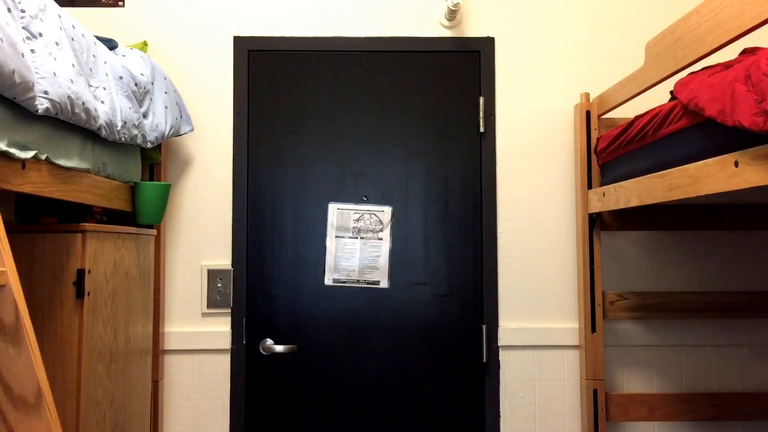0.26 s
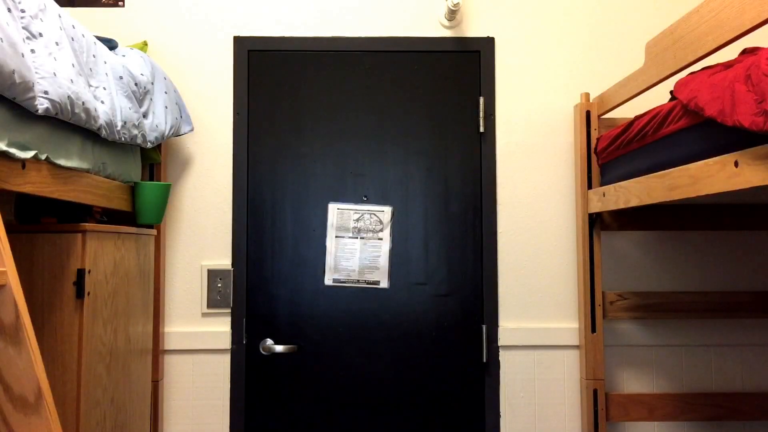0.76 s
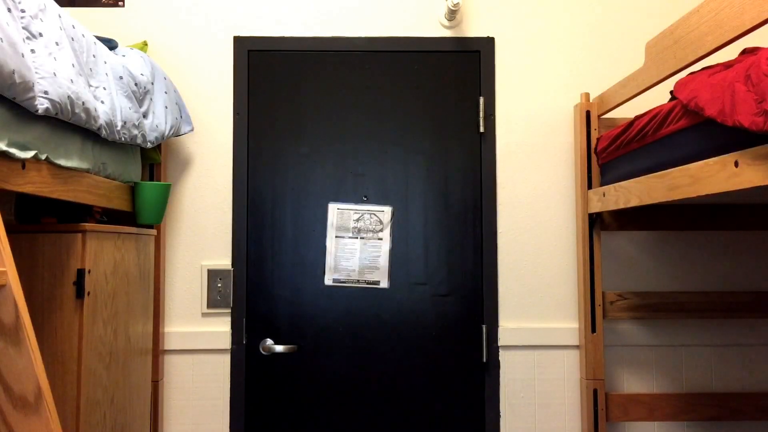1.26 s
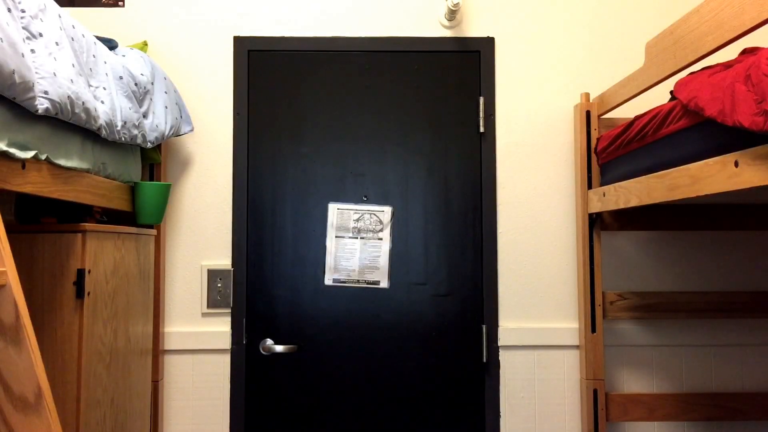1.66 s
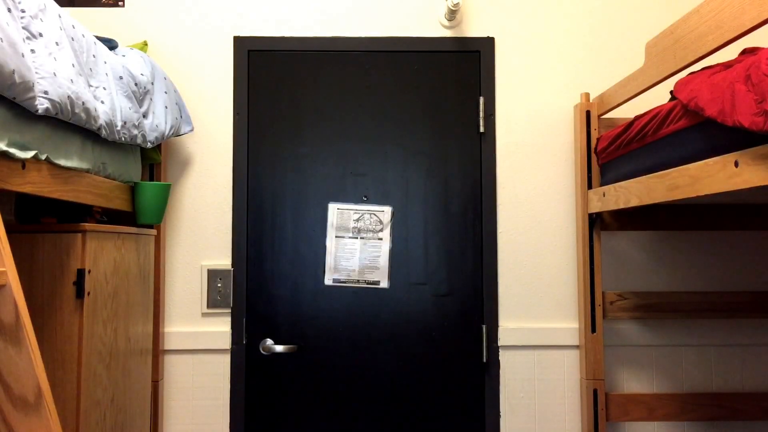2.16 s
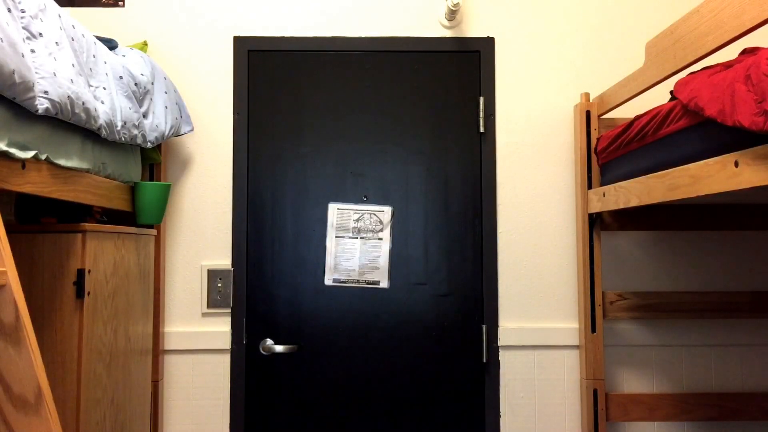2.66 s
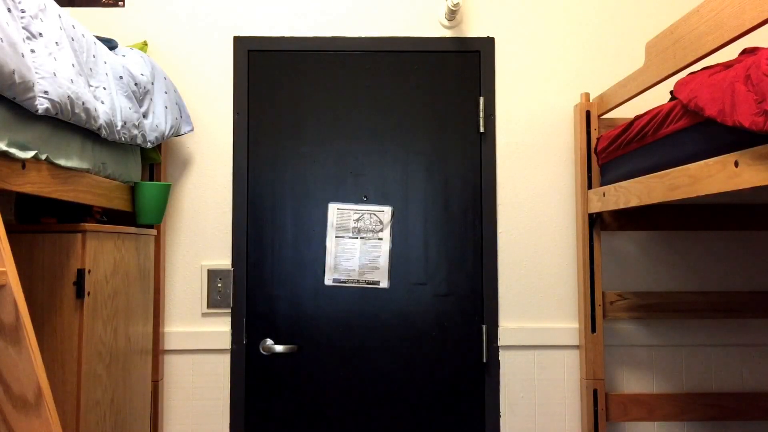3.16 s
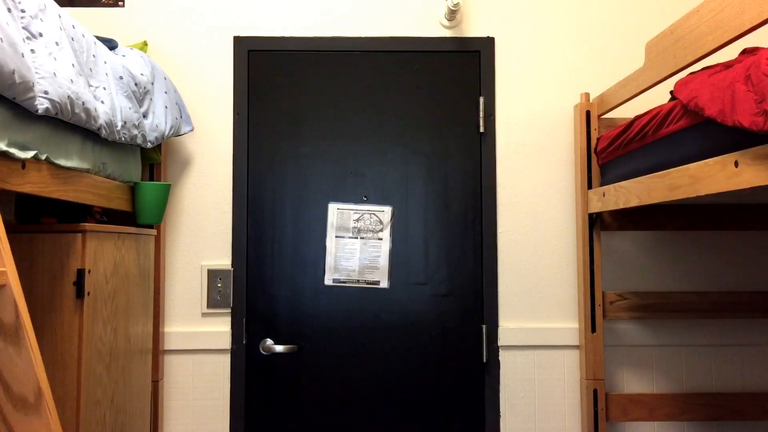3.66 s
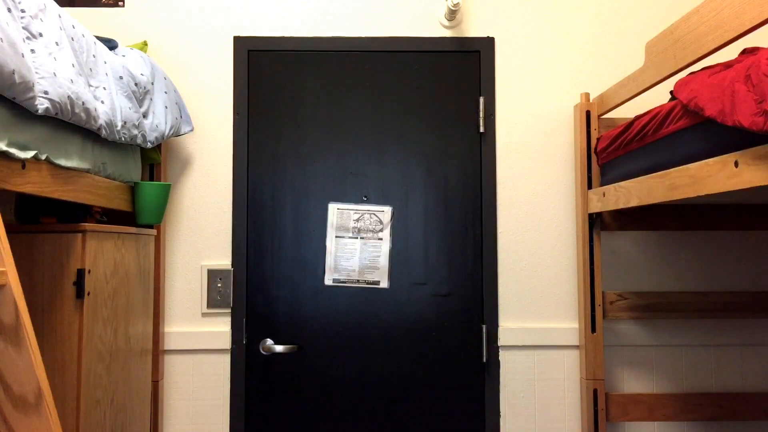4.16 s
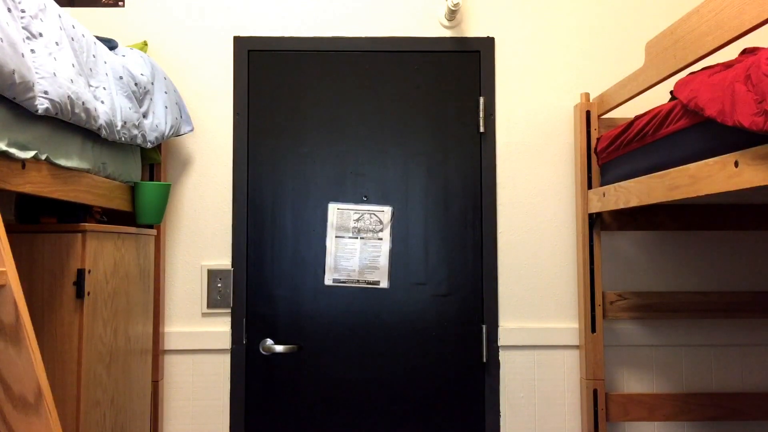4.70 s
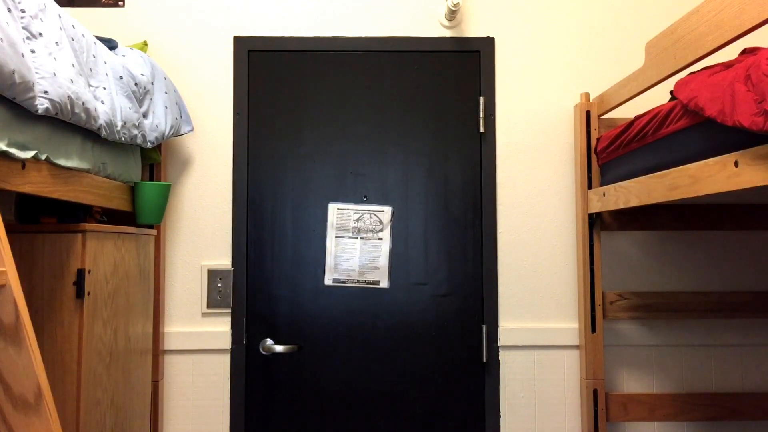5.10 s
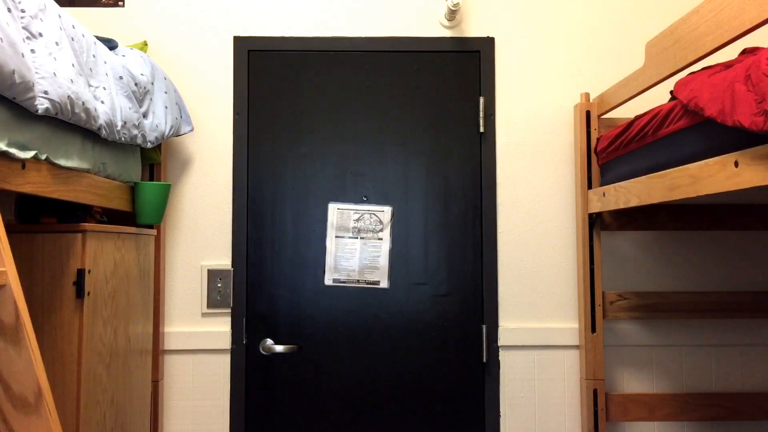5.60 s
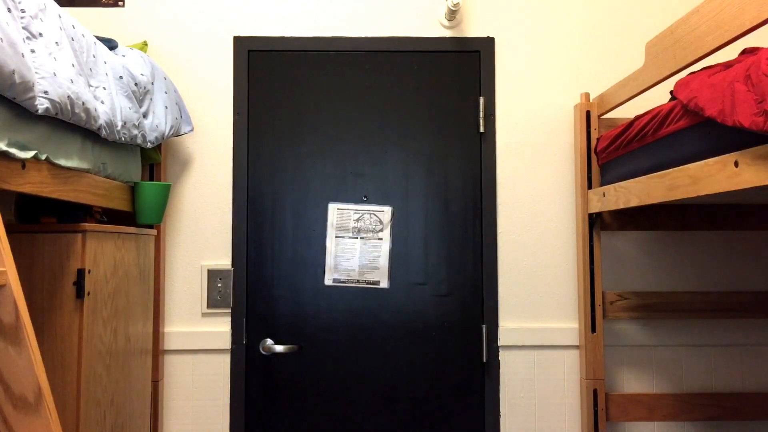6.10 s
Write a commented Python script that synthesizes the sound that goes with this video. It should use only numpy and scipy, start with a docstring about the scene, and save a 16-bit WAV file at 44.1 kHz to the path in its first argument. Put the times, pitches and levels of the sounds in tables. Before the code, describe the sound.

Heard from inside a bedroom, a few metres from the door, low ventilation noise and a wavering hum come first, with faint far-off squeaks and a motor that swells and fades. Then the door is unlocked from outside: a soft knock, metallic clicks and short scrapes of the key, the bolt snapping as the door thuds, and finally a crisp click of the handle and latch.

```python
"""A door unlocked, heard from the bedroom.

Beyond a heavy closed door a few metres away, a key slides in and turns, the bolt snaps, the handle
moves and the latch lets go. Each contact excites damped modes of the door panel, the lock case and a
small steel part; friction adds scrapes, and shoves make the door thud. Under it lie ventilation noise,
a faint mains tone, a low hum that comes and goes, the throb of a far motor and distant squeaks."""
import sys
import numpy as np
from scipy import signal
from scipy.fft import rfft, irfft
from scipy.io import wavfile
from scipy.ndimage import uniform_filter1d

SR = 44100
rng = np.random.default_rng(int(sys.argv[2]) if len(sys.argv) > 2 else 0)


def materialize(psi):
    """Save the field psi as 16-bit PCM at rate SR to the path in sys.argv[1].

    A 1-D psi becomes a single channel; in a 2-D psi each row is a channel.
    """
    bounded = np.clip(np.atleast_2d(psi).T, -1, 1)
    quanta = np.round(bounded * 32767).astype(np.int16)
    wavfile.write(sys.argv[1], SR, quanta)


N = 279594
RING = SR // 2   # samples allowed for one contact to die away


def from_db(db):
    """Decibels to amplitude ratio."""
    return 10 ** (np.asarray(db) / 20)


def rms_one(x):
    """Normalisation to an rms of 1."""
    return x / np.sqrt(np.mean(x ** 2) + 1e-20)


def at_level(x, db):
    """Normalisation of a transient by the rms of its first 50 ms."""
    return x * from_db(db) / np.sqrt(np.mean(x[:SR // 20] ** 2) + 1e-20)


def in_time(rows):
    """Linear interpolation of (seconds, value) points at every sample."""
    times, values = np.transpose(rows)
    return np.interp(np.arange(N) / SR, times, values)


def add(out, s, sound):
    """Superposition: a sound joins the mix at s seconds."""
    at = int(np.clip(round(s * SR), 0, N - 1))
    out[at:at + len(sound)] += sound[:N - at]


def band(x, low_hz, high_hz, order=2):
    """Causal Butterworth band-pass."""
    edges = [low_hz, min(high_hz, SR / 2 - 100)]
    return signal.sosfilt(signal.butter(order, edges, "band", fs=SR, output="sos"), x)


def drift(rate_hz):
    """Slow random fluctuation: low-passed noise of rms 1."""
    slow = signal.sosfilt(signal.butter(2, rate_hz, fs=SR, output="sos"), rng.standard_normal(N + SR))
    return rms_one(slow[SR:])


def shaped_noise(spectrum):
    """Spectral shaping: noise of rms 1 follows (Hz, dB) points and rolls off beyond them."""
    hz, db = np.transpose(spectrum)
    bins = np.maximum(np.fft.rfftfreq(N, 1 / SR), 1)
    gain = from_db(np.interp(np.log(bins), np.log(hz), db))
    roll_off = np.hypot(1, (bins / hz[-1]) ** 20) * np.hypot(1, (hz[0] / bins) ** 2)
    return rms_one(irfft(rfft(rng.standard_normal(N)) * gain / roll_off, N))


def resonate(force, modes, scatter_db=7.5):
    """Modal superposition: a force drives damped resonators, each with random sign and strength."""
    out = 0
    for hz, width_hz, db in modes:
        radius = np.exp(-np.pi * width_hz / SR)
        poles = [1, -2 * radius * np.cos(2 * np.pi * hz / SR), radius ** 2]
        gain = rng.choice([-1, 1]) * from_db(db + scatter_db * rng.standard_normal())
        out = out + gain * (1 - radius ** 2) / 2 * signal.lfilter([1, 0, -1], poles, force)
    return out


# Spectra of the ventilation. Each row: frequency in Hz, relative spectral density in dB.
RUMBLE_SPECTRUM = [(18, -38), (33, -34), (44, -6), (60, -15), (78, -9), (100, -9), (135, 1), (158, 3),
                   (175, -12), (190, -2.5), (228, -6), (275, -5), (345, -11), (410, -24)]
HISS_SPECTRUM = [(240, -9), (400, -3), (445, -1.5), (488, -9.5), (527, -2), (634, -3), (874, -4), (973, -4),
                 (1170, -5), (1410, -9), (1660, -9), (2230, -13.5), (4940, -19), (8980, -22.5),
                 (15600, -28)]
# Course of the rumble. Each row: time in seconds, level in dB.
RUMBLE_LEVEL = [(0, -52.5), (1.7, -50.5), (3.1, -54), (3.4, -56.5), (3.75, -49.5), (3.92, -57.5),
                (4.05, -51.5), (5.4, -52.5), (5.7, -57), (5.95, -51.5), (6.34, -58)]


def ventilation(hiss_db=-64.5):
    """Broadband noise: a slowly modulated rumble and a steady hiss."""
    rumble = from_db(in_time(RUMBLE_LEVEL)) * shaped_noise(RUMBLE_SPECTRUM)
    return rumble + from_db(hiss_db) * shaped_noise(HISS_SPECTRUM)


def mains_tone(hz=360, db=-70):
    """A pure tone at one harmonic of the mains."""
    return from_db(db) * np.sqrt(2) * np.sin(2 * np.pi * hz * np.arange(N) / SR)


# Far-off squeaks. Each row: midpoint in seconds, frequency in Hz, level at the midpoint in dB.
SQUEAKS = [(0.25, 1170, -70), (0.925, 812, -66), (1.07, 882, -65), (1.25, 810, -66.5), (1.36, 857, -63),
           (1.635, 860, -63.5), (1.885, 805, -65.5)]


def squeaks(length_s=0.18, roughness=0.99):
    """Narrow-band noise around a short tone blurs its pitch and roughens it."""
    out, t = np.zeros(N), np.arange(int(length_s * SR)) / SR
    for s, hz, db in SQUEAKS:
        blur = rms_one(band(rng.standard_normal(len(t)), hz * 0.815, hz * 1.08))
        tone = rms_one(np.sin(2 * np.pi * hz * t) + roughness * blur)
        add(out, s - length_s / 2, from_db(db) * np.hanning(len(t)) * tone)
    return out


def wavering_tone(phase, depth_db, rate_hz):
    """Random modulation: noise in phase varies the amplitude, noise in quadrature the phase."""
    depth = from_db(depth_db)
    return (1 + depth * drift(rate_hz)) * np.sin(phase) + depth * drift(rate_hz) * np.cos(phase)


# Swells of the hum. Each row: start and end of the hold in seconds, level in dB, sag in Hz per second.
HUM_SWELLS = [(0, 0.08, -46, 1), (0.69, 1.428, -52, 1.9), (4.037, 4.114, -53, 1.4),
              (4.586, 5.472, -49, 12.6)]


def low_hum(pitch_hz=155.1, rest_db=-70, attack_s=0.16, release_s=0.075, beat_hz=9.4):
    """Beating: a low note swells and sags in pitch, interfering with a weaker tone just above it."""
    t = np.arange(N) / SR
    hz, gain = pitch_hz, from_db(rest_db)
    for start_s, end_s, db, sag_hz_per_s in HUM_SWELLS:
        swell = np.exp(-np.maximum(start_s - t, 0) / attack_s - np.maximum(t - end_s, 0) / release_s)
        gain = np.maximum(gain, from_db(db) * swell)
        hz = np.where(t < start_s, hz, pitch_hz - sag_hz_per_s * (np.minimum(t, end_s) - start_s))
    phase = 2 * np.pi * np.cumsum(hz) / SR
    note = wavering_tone(phase, depth_db=-34, rate_hz=20.5)
    neighbour = from_db(-8.5) * np.sin(phase + 2 * np.pi * beat_hz * t + drift(0.61))
    return gain * np.sqrt(2) * (note + neighbour)


# Speed of the far motor. Each row: time in seconds, speed in turns per second.
MOTOR_SPEED = [(0, 13.6), (1, 13.95), (1.5, 14.26), (2, 14.52), (2.35, 14.57), (3, 14.26), (3.5, 14.05),
               (3.8, 13.72), (6.34, 13.8)]
# Its strength. Each row: time in seconds, level in dB of a harmonic exactly at resonance.
MOTOR_LEVEL = [(0, -68), (1, -55), (1.5, -47.5), (2.1, -44), (2.6, -44), (3.1, -46.5), (3.8, -51.5),
               (4.1, -65), (5.5, -62.5), (5.8, -55), (6.34, -65.5)]


def motor(resonance_hz=263.5, half_width_hz=8.65):
    """Forced vibration: harmonics of the rotation glide through a resonance of the building and beat."""
    speed = in_time(MOTOR_SPEED)
    shaft_angle = 2 * np.pi * np.cumsum(speed) / SR
    out = np.zeros(N)
    for harmonic in range(16, 21):
        response = 1 / (1 + ((harmonic * speed - resonance_hz) / half_width_hz) ** 2)
        phase = harmonic * shaft_angle + rng.uniform(0, 2 * np.pi) + 0.5 * drift(1.87)
        out += response * wavering_tone(phase, depth_db=-17, rate_hz=9)
    return from_db(in_time(MOTOR_LEVEL)) * np.sqrt(2) * out


# Modes of the door leaf. Each row: frequency in Hz, bandwidth in Hz, gain in dB.
LEAF_MODES = [(47, 9, -6), (81, 7.8, 1), (106, 11, -3), (125.5, 12, -5)]
# Shoves from key and handle. Each row: start in seconds, level in dB.
SHOVES = [(3.649, -51), (4.891, -50), (5.318, -41.5), (5.949, -57), (6.192, -52)]


def door_thuds(push_s=0.0057):
    """Impulse response: a soft push excites the low modes of the whole door in its frame."""
    out = np.zeros(N)
    push = np.sin(np.pi * np.minimum(np.arange(RING) / (push_s * SR), 1)) ** 2
    for s, db in SHOVES:
        thud = band(resonate(push, LEAF_MODES, scatter_db=8.5), 30, 160)
        add(out, s, at_level(thud, db))
    return out


def whiten(burst, smoothing_bins=110):
    """Whitening: division by its smoothed spectrum levels a burst's colour but keeps its course."""
    spectrum = rfft(burst, 2 * RING)
    power = uniform_filter1d(np.abs(spectrum) ** 2, smoothing_bins)
    return irfft(spectrum / np.sqrt(np.abs(power) + 1e-20))[:RING]


def blow(slide_s, direct_db, walls_db, t60, direct_s=0.0018, walls_s=0.021, spread_s=0.0073, grip=0.25):
    """A gritty contact in a room: direct sound, early reflections and diffuse tail add in power."""
    t = np.arange(RING) / SR
    direct = from_db(direct_db) * np.exp(-t / direct_s)
    walls = from_db(walls_db) * np.exp(-0.5 * ((t - walls_s) / spread_s) ** 2)
    tail = np.exp(-np.log(1000) * t / t60)
    # sliding smears the energy over time, and the parts take a moment to grip
    power = signal.lfilter([1], [1, -np.exp(-2 / (slide_s * SR))], direct ** 2 + walls ** 2 + tail ** 2)
    rise = 1 - np.exp(-t / (grip * slide_s))
    return whiten(rise * np.sqrt(power) * rng.standard_normal(RING))


def favour(modes, centre_hz, lift_db, db_per_square_octave=10):
    """Selective excitation: the contact point favours modes near one pitch and may lift those on it."""
    weighted = []
    for hz, width_hz, db in modes:
        fall = db_per_square_octave * np.log2(hz / centre_hz) ** 2
        lift = lift_db * np.exp(-((hz / centre_hz - 1) / 0.04) ** 2)
        weighted.append((hz, width_hz, db - fall + lift))
    return weighted


# Modes of the door panel. Each row: frequency in Hz, bandwidth in Hz, gain in dB.
PANEL_MODES = [(317, 27, 4), (374.6, 9.9, 9), (390.7, 14.4, 10.5), (408, 37, -14), (509, 35, -6),
               (559, 15, -2), (648, 33, 1), (723, 23, -1.5), (808, 44, -11)]


def panel_ring(slide_s, centre_hz, lift_db):
    """Plate vibration: the door panel answers a blow with a hollow knock."""
    push = blow(slide_s, direct_db=-11, walls_db=-14, t60=0.2)
    ring = resonate(push, favour(PANEL_MODES, centre_hz, lift_db), scatter_db=0)
    return band(ring + from_db(-9) * push, 200, 750)


# Modes of the lock case. Each row: frequency in Hz, bandwidth in Hz, gain in dB.
CASE_MODES = [(892, 22, -3), (932, 22, -3), (1042, 26, 6.5), (1145, 26, -1.5), (1204, 26, -1.5),
              (1293, 26, -0.5), (1448, 36, -2), (1500, 24, -1.5), (1683, 24, 8), (1793, 28, -2),
              (1950, 70, -13), (2105, 50, -13), (2320, 40, -6), (2408, 26, 2), (2630, 70, -3),
              (2800, 70, -1)]


def case_ring(slide_s, centre_hz, lift_db):
    """Resonant build-up: a bare clack comes first, then the modes of the lock case grow."""
    knock = blow(slide_s, direct_db=2, walls_db=8, t60=0.22, walls_s=0.012, spread_s=0.0045)
    clack = blow(slide_s, direct_db=12, walls_db=-2, t60=0.31)
    clack = from_db(-4.5) * band(clack, centre_hz * 0.58, centre_hz * 1.15)
    ring = resonate(knock, favour(CASE_MODES, centre_hz, lift_db), scatter_db=-1.1)
    return band(ring + clack, 810, 2300, order=4)


# Modes of the small steel parts. Each row: frequency in Hz, bandwidth in Hz, gain in dB.
KEY = [(2300, 320, 8), (2800, 190, 8), (3624, 62, 8), (4280, 170, -0.5), (5670, 350, -8), (6900, 350, -7)]
BOW = [(2280, 150, 6), (3300, 270, 0), (4360, 90, 0), (4710, 52, 5)]
KEY_RING = [(2400, 200, 4), (3500, 200, 0), (4440, 59, 11), (6250, 300, -2), (6850, 300, -5)]
PLUG = [(2270, 180, 11), (2740, 260, 0.5), (3250, 220, 5), (5900, 340, -9)]
PINS = [(2720, 100, 17.5), (3370, 200, 2.5), (4080, 64, 6), (4360, 190, 1), (4800, 400, -3),
        (6240, 270, -4), (6800, 250, -2)]
SPRING = [(1940, 88, 5), (2250, 62, -3), (4400, 400, -19)]
CAM = [(2800, 240, 8.5), (3250, 200, -9), (4400, 210, 6.5), (4960, 120, 3), (5460, 300, 1), (6040, 300, 0),
       (6950, 170, 2), (8400, 200, -6), (9100, 370, -6), (12800, 900, -15)]
BOLT = [(2350, 240, 15), (2900, 550, 4.5), (4490, 210, 9.5), (5300, 360, -12), (7160, 460, -5),
        (8030, 450, 5), (9140, 230, -3), (11700, 320, -2), (13000, 600, -5), (15400, 500, -7)]
LATCH = [(2400, 210, 17.5), (3190, 440, 10), (4230, 160, 4), (4400, 220, 9), (5430, 500, -7),
         (6050, 170, -5), (7000, 400, -5), (8800, 210, -5), (11800, 140, -1), (12700, 400, -12)]
# The parts by name. Each entry: modes, crack level in dB relative to the ring, upper band edge in Hz,
# time in seconds for the tail of the blow to fall 60 dB.
STEEL_PARTS = {"key": (KEY, -22, 11000, 0.33), "plug": (PLUG, -15, 10000, 0.27),
               "spring": (SPRING, -22, 4200, 0.16), "ring": (KEY_RING, -5, 8000, .16),
               "bow": (BOW, -20, 7000, .18), "pins": (PINS, -11, 8300, 0.2), "cam": (CAM, -9, 19000, 0.26),
               "bolt": (BOLT, -15, 14500, .19), "latch": (LATCH, -9.5, 13000, 0.25)}


def steel_ring(slide_s, part):
    """Damped vibration: a part held tight in the lock gives a crack and a short ring."""
    modes, crack_db, top_hz, t60 = STEEL_PARTS[part]
    tick = blow(slide_s, direct_db=10, walls_db=-37, t60=t60, direct_s=0.0062, grip=0.32)
    crack = blow(slide_s, direct_db=11, walls_db=-10, t60=0.15, direct_s=0.0038, grip=0.43)
    crack = at_level(band(crack, 2600, 5300, order=1), crack_db)
    ring = at_level(resonate(tick, modes, scatter_db=1.9), 0)
    return band(ring + crack, 1470, top_hz)


def contact(slide_s, case_db, case_hz, case_lift_db, panel_db, panel_hz, panel_lift_db, steel_db, part):
    """Structure-borne sound: one impact rings the door panel, the lock case and a steel part."""
    panel = at_level(panel_ring(slide_s, panel_hz, panel_lift_db), panel_db)
    case = at_level(case_ring(slide_s, case_hz, case_lift_db), case_db)
    steel = at_level(steel_ring(slide_s, part), steel_db)
    return panel + case + steel


# Rubbing of key and handle. Each row: start and end in seconds, case and key levels mid-stroke in dB.
RUBS = [(4.812, 4.963, -58, -63.5), (4.947, 5.123, -58.5, -82), (5.15, 5.268, -60, -75),
        (5.292, 5.327, -48, -54.5), (5.546, 5.667, -65, -89), (5.88, 6.136, -60.5, -80)]


def rubs(catches_per_s=710, spread_db=2.5):
    """Sliding friction: dense small catches of metal on metal keep the lock case and the key ringing."""
    out = np.zeros(N)
    catches = (rng.random(N) < catches_per_s / SR) * rng.choice([-1, 1], N)
    strength = from_db(spread_db * np.minimum(rng.exponential(1, N), 4))
    grit = signal.fftconvolve(catches * strength, blow(0.0017, direct_db=9, walls_db=-2, t60=0.44))[:N]
    case = rms_one(band(resonate(grit, CASE_MODES) + from_db(-7) * grit, 700, 1820))
    key = rms_one(resonate(grit, KEY))
    for start_s, end_s, case_db, key_db in RUBS:
        first, last = int(start_s * SR), int(end_s * SR)
        stroke = np.sin(np.linspace(0, np.pi, last - first))
        scrape = from_db(case_db) * case[first:last] + from_db(key_db) * key[first:last]
        add(out, start_s, stroke * scrape)
    return out


# Taps in the lock. Each row: start in seconds, case level in dB, centre of its ring in Hz,
# panel level in dB, steel level in dB, steel part.
TAPS = [(3.917, -54.5, 1970, -62, -62, "spring"), (3.942, -59, 1014, -80, -73, "spring"),
        (4.231, -48, 1430, -49.5, -63, "plug"), (4.303, -61, 1650, -65, -74, "spring"),
        (4.519, -58.5, 1390, -67, -91, "key"), (4.765, -66.5, 1530, -69, -90, "key"),
        (4.853, -59, 1710, -52.5, -65, "key"), (4.901, -65, 2000, -57, -60, "key"),
        (5.015, -59, 1600, -58, -82, "spring"), (5.024, -55, 1420, -74, -66, "ring"),
        (5.144, -59, 1200, -59.5, -70, "bow"), (5.177, -75, 1920, -64, -69, "key"),
        (5.245, -63, 1500, -57, -88, "key"), (5.343, -55, 1900, -60, -56, "cam"),
        (5.35, -56, 2300, -66, -56.5, "bolt"), (5.57, -57, 1070, -58, -75, "key"),
        (5.773, -63, 2510, -69, -68, "key"), (6, -55.5, 1110, -57, -85, "key"),
        (6.226, -56.5, 1600, -70, -66, "spring")]


def taps(slide_s=0.0015, panel_hz=405):
    """Light impacts: key, bolt and handle tap and rebound."""
    out = np.zeros(N)
    for s, case_db, case_hz, panel_db, steel_db, part in TAPS:
        add(out, s, contact(slide_s, case_db, case_hz, 0, panel_db, panel_hz, 0, steel_db, part))
    return out


# Turns of key and handle. Each row: first slip, last slip and sliding time in seconds,
# final case level in dB, growth in dB per slip, final panel level in dB.
TURNS = [(4.814, 4.884, 0.00095, -41.5, 8.5, -50), (5.284, 5.299, 0.0053, -43, 6, -47.5),
         (5.907, 5.943, 0.0018, -48.5, 11.5, -59)]


def turns(slip_gap_s=0.035, case_hz=1530, panel_hz=405, panel_share=0.095, steel_re_case_db=-24.5):
    """Stick-slip motion: a turning part slips harder each time as its spring tightens."""
    out = np.zeros(N)
    for first_s, last_s, slide_s, last_case_db, growth_db, last_panel_db in TURNS:
        count = 1 + max(1, round((last_s - first_s) / slip_gap_s))
        for slips_left, s in enumerate(np.linspace(last_s, first_s, count)):
            softer_db = growth_db * slips_left
            case_db = last_case_db - softer_db
            panel_db = last_panel_db - panel_share * softer_db
            steel_db = case_db + steel_re_case_db
            add(out, s, contact(slide_s, case_db, case_hz, 0, panel_db, panel_hz, 0, steel_db, "key"))
    return out


# Snaps of the lock. Each row: start and sliding time in seconds; for the case and then the panel,
# level in dB, centre of the ring in Hz and lift there in dB; steel level in dB; steel part.
SNAPS = [ (3.641, 0.0026, -55.5, 1730, 1, -48.5, 510, 14, -57.5, "plug"),
         (4.195, 0.0042, -38, 1750, 0, -41, 446, -1, -51, "pins"),
         (4.612, 0.0014, -38.5, 1722, 9, -51, 470, 0, -54.5, "cam"),
         (5.324, 0.0029, -38.5, 1200, 8, -45, 570, -11, -46.5, "bolt"),
         (6.157, 0.0018, -33, 1435, 2.5, -47.5, 770, -1, -47, "latch")]


def drags(length_s=0.04, re_case_db=-17, reference_slide_s=0.0036):
    """Friction under rising force: metal drags before each snap, louder for a longer sliding time."""
    out, force = np.zeros(N), np.linspace(0, 1, int(length_s * SR))
    for s, slide_s, case_db, *_ in SNAPS:
        grit = rng.standard_normal(len(force))
        scrape = rms_one(band(grit, 800, 2400)) + from_db(-14) * rms_one(band(grit, 2300, 5700))
        gain = from_db(case_db + re_case_db) * slide_s / reference_slide_s
        add(out, s + slide_s / 2 - length_s, gain * force * scrape)
    return out


def snaps():
    """Hard impacts: the key and the sprung parts of the lock snap home."""
    out = np.zeros(N)
    for s, *snap in SNAPS:
        add(out, s, contact(*snap))
    return out


def scene():
    """Superposition of lock, door and background in one channel."""
    background = low_hum() + mains_tone() + ventilation()
    lock = snaps() + taps() + turns() + rubs() + drags()
    return (lock + door_thuds() + background + motor() + squeaks())[None]


def record(dry, cutoff_hz=15750):
    """Band limiting: a steep elliptic low-pass removes the highest treble."""
    return signal.sosfilt(signal.ellip(12, 0.1, 70, cutoff_hz, fs=SR, output="sos"), dry)


dry = scene()
out = record(dry)
materialize(out)
```